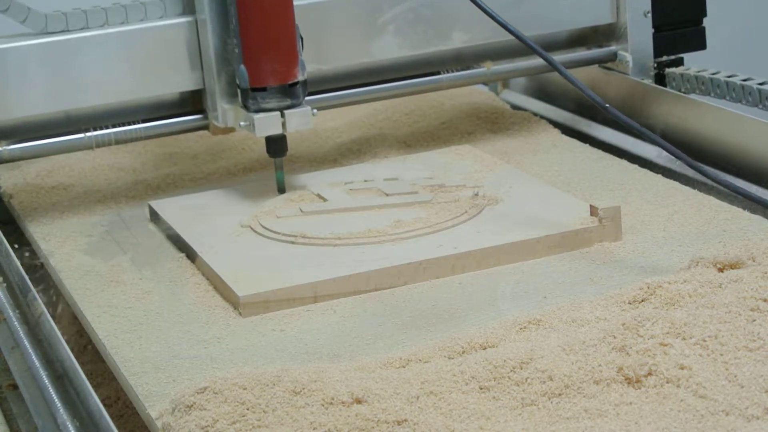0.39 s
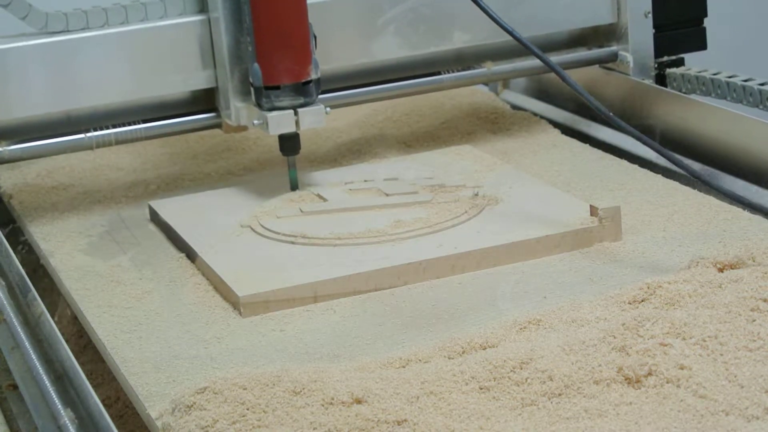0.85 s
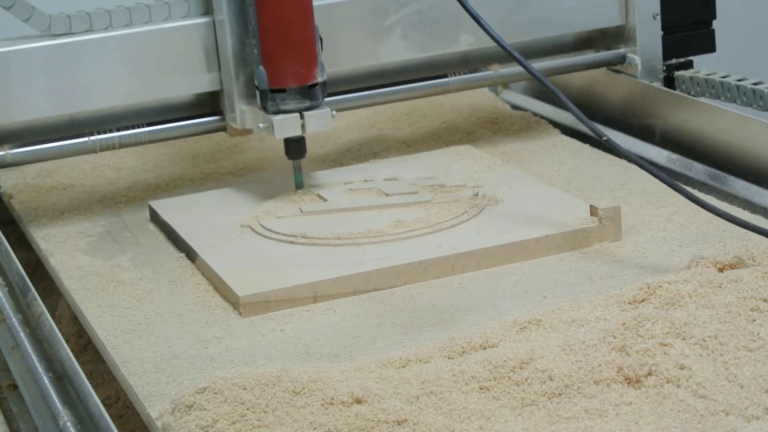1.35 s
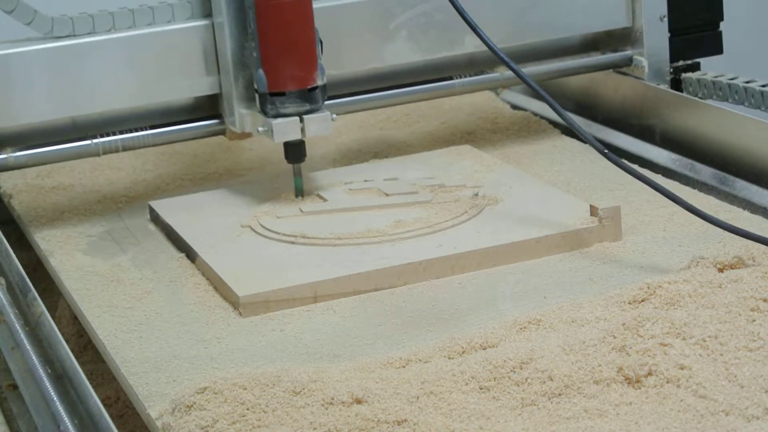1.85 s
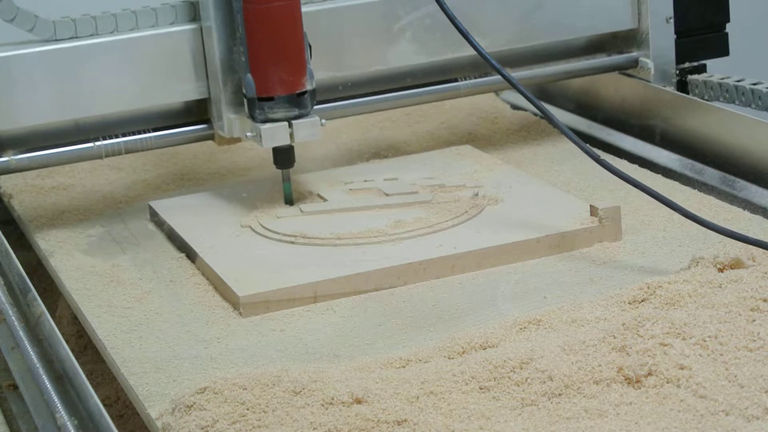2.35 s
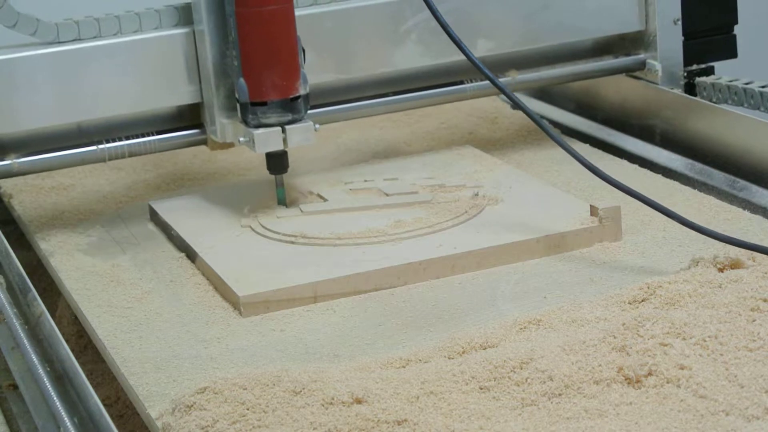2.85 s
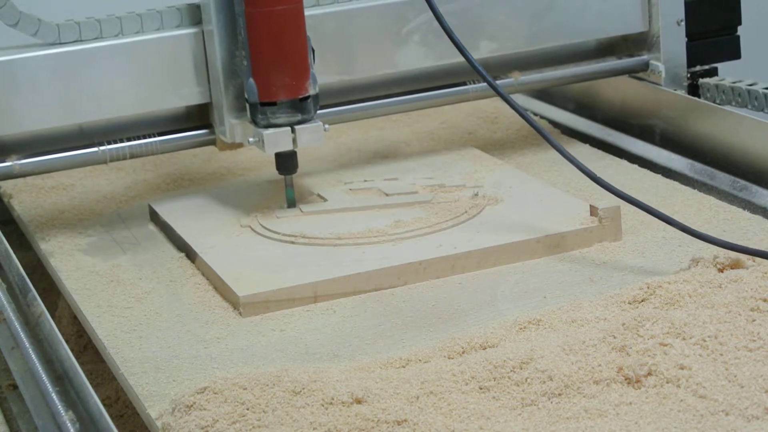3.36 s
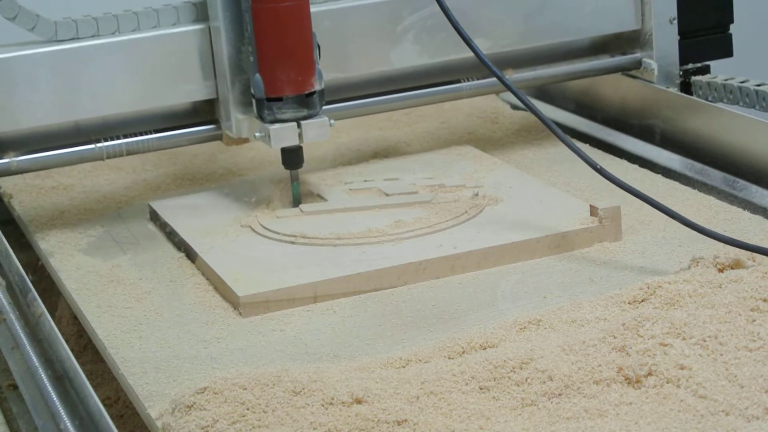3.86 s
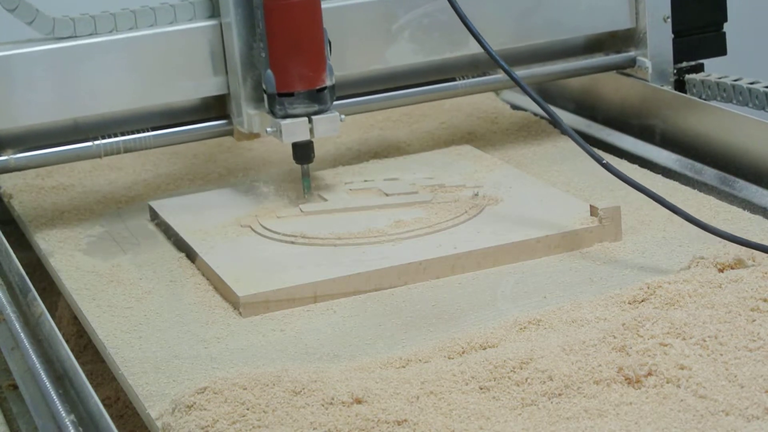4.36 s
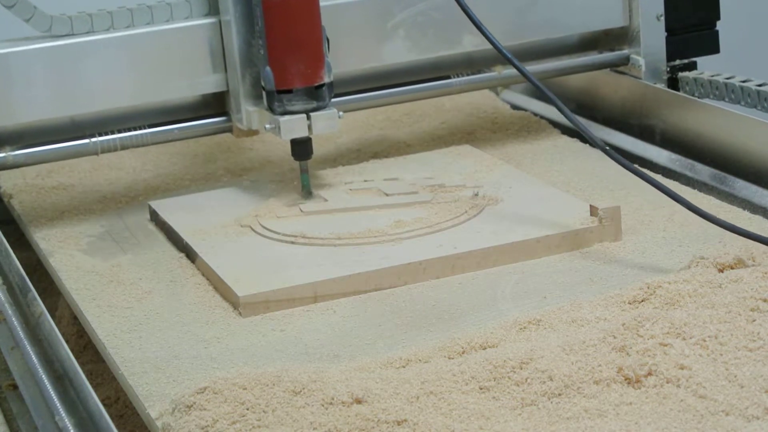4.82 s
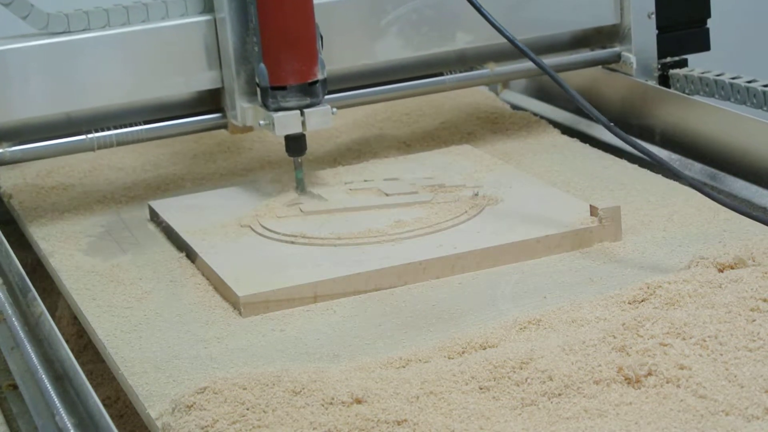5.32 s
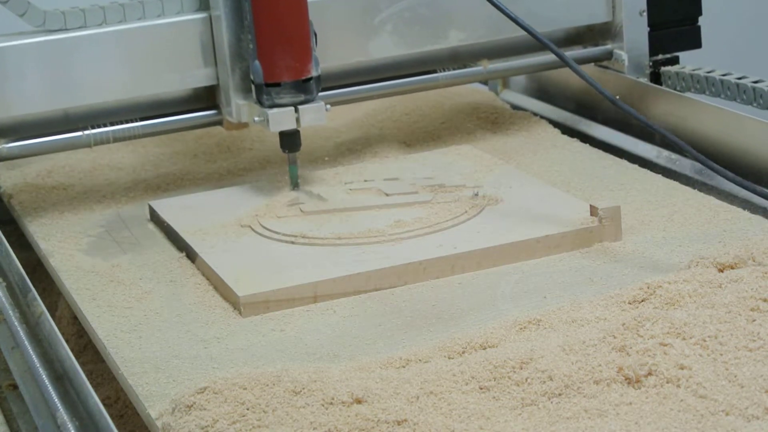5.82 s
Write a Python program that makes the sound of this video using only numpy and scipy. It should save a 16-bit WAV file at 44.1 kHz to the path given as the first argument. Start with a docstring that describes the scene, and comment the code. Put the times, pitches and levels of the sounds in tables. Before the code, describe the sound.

A high-speed router spindle whines steadily while its cutter rasps through a wooden board, pitch sagging and rising slightly, with piercing chatter and airy hiss.

```python
"""Router spindle milling a board

A router spindle on a gantry mills a wooden board in a hard workshop, heard by two microphone ports.
The two-flute cutter sings at multiples of the shaft speed, which sags under load; in two spells the bit
chatters at its own resonance. Cooling fan, brushes and chips are shaped noise that hisses and rasps;
the frame rumbles and the axis motors hum faintly below as gliding sines."""
import sys
import numpy as np
from scipy import signal
from scipy.fft import rfft, irfft, next_fast_len
from scipy.io import wavfile
from scipy.ndimage import uniform_filter1d, map_coordinates

SR = 44100
rng = np.random.default_rng(int(sys.argv[2]) if len(sys.argv) > 2 else 0)


def field_ratio(decibels):
    """Amplitude ratio for a level in dB (20 dB per decade); scalars and array-likes work."""
    return 10 ** (np.asarray(decibels, dtype=float) / 20)


def unload_wav(signal):
    """Save mono or channel-first audio to the path in sys.argv[1] as 16-bit WAV at rate SR, clipped to [-1, 1]."""
    wavfile.write(
        sys.argv[1],
        SR,
        np.round(np.clip(np.atleast_2d(signal).T, -1, 1) * 32767).astype(np.int16),
    )


N = 273403
COARSE = np.arange(0, N + 64, 64)  # sample positions at which slow gains are drawn

# shaft speed: (start_s, shaft_turns_hz)
SHAFT_SPEED = [(0.0, 413.3), (0.26, 413.9), (0.58, 412.2), (0.66, 416.7), (0.76, 417.0), (0.86, 400.5),
               (1.0, 402.6), (1.4, 402.0), (1.95, 404.8), (2.2, 404.8), (2.61, 401.8), (3.1, 405.5),
               (3.17, 412.0), (3.31, 406.5), (3.44, 414.6), (3.59, 395.2), (3.75, 399.0), (4.11, 395.3),
               (4.35, 400.0), (4.43, 397.5), (4.56, 403.0), (4.68, 432.5), (4.84, 431.6), (4.95, 428.6),
               (5.6, 425.8), (5.68, 424.3), (6.07, 425.3), (6.2, 419.0)]
# cutter passes shift the order levels: (start_s, end_s, even_orders_db, odd_orders_db, tilt_db_per_octave)
CUTTER_PASSES = [(0, .85, 3, 1, -0.5), (0.926, 3.084, 0.5, -2, 0), (3.2, 3.299, -3.5, -4, -3.5),
                 (3.65, 4.396, -0.5, -4.5, -2), (4.6, 4.778, -5.5, -1.5, -1.5), (4.9, 5.99, -2, 2.5, 1),
                 (6.075, 6.2, 4.5, -1, 0.5)]
# two spells of bit chatter: (start_s, resonance_hz, level_db, beat_depth_0_to_1)
CHATTER_SPELLS = [
    [(0.8, 3660, -33, 0.7), (0.91, 3646, -26, 0.64), (1.15, 3650, -36.5, 0.75), (1.3, 3650, -23.5, 0.43),
     (1.78, 3654, -30.5, 0.73), (1.87, 3724, -28.5, 0.3), (2.4, 3678, -24, 0.23), (2.47, 3671, -30, 0.25),
     (2.65, 3678, -19, .2), (2.75, 3674, -29, .2), (2.82, 3680, -20.5, 0.04), (3.02, 3667, -25.5, 0.01),
     (3.15, 3734, -37, 0.1), (3.55, 3620, -29.5, .5)],
    [(5.5, 3690, -54, .3), (5.62, 3647, -33.5, 0.2), (5.86, 3615, -33, 0.2), (6.0, 3640, -41, .3)],
]
# side tones of the chatter, chopped by the teeth: distance (shaft_orders)
CHOP_OFFSETS = (-2, -1, 1, 2, 4)
# the same side tones: level relative to the chatter (level_db)
CHOP_LEVELS = (-16.5, -29, -20, -13, -27)
# noise levels before their random wander: (start_s, rasp_db, hiss_db, frame_rumble_db)
NOISE_LEVELS = [(0.0, -31.5, -30.5, -55.5), (0.5, -33.5, -32, -56.5), (1.0, -33, -29, -58),
                (1.36, -35, -31, -69), (1.97, -32.5, -31.5, -55.5), (2.4, -35, -31, -60),
                (2.7, -36, -34.5, -64), (3.18, -37, -34.5, -62), (3.45, -29.5, -28.5, -53.5),
                (3.75, -32, -30.5, -63.5), (4.25, -31, -28.5, -58), (4.6, -31.5, -32, -56.5),
                (4.9, -29, -27, -60), (5.18, -30.5, -30.5, -64), (5.85, -29, -29.5, -61),
                (6.2, -30, -28.5, -51.5)]
# relative noise spectra of chips, fan, brushes and frame, each (frequency_hz, density_db_per_hz)
RASP_SPECTRUM = [(250, -74), (350, -16.5), (500, -14.5), (700, -2), (1000, -3), (1350, 3), (1850, -2),
                 (2200, 0.5), (2800, 1), (3800, 3.5), (5000, -5.5), (7000, -57)]
FAN_SPECTRUM = [(2500, -58), (3500, -8.5), (5000, 1), (6500, 2), (8000, 2.5), (9500, -6), (12000, -60)]
BRUSH_SPECTRUM = [(6500, -64), (8500, -6), (10000, -1), (12500, -1.5), (14500, -5), (16000, -14),
                  (18000, -30)]
FRAME_SPECTRUM = [(20, -30), (40, -16), (90, -17.5), (120, 0.5), (170, -1), (220, -2.5), (300, 2.5),
                  (400, -16.5), (600, -53)]
# feed motor hum before its wander: (start_s, pitch_hz, level_db)
AXIS_HUM = [(0, 235, -66), (.5, 180, -68), (1.4, 192, -67), (1.8, 168, -72), (2.15, 258, -64),
            (2.6, 305, -65), (2.9, 340, -78), (3.9, 315, -68), (4.3, 255, -63), (4.5, 240, -78),
            (5.75, 360, -69), (6.2, 285, -65)]
# left-right likeness of the noise: (frequency_hz, likeness_0_to_1)
NOISE_LIKENESS = [(100, 0.87), (300, 0.89), (600, 0.81), (1200, 0.39), (1900, 0.81), (2800, 0.081),
                  (4400, .02), (8000, .03), (14000, 0.24)]
# tonal balance between the ports: (frequency_hz, left_over_right_db)
PORT_LEAN = [(100, 0.5), (2800, 0), (7000, 0), (10000, 2), (14000, 5.5)]
# opposed part of each tone: (frequency_hz, side_relative_to_mid_db)
TONE_SIDE_LEVEL = [(400, -10), (800, -19.5), (1600, -7), (2400, -2.5), (3600, 1), (8000, 0.5)]
# decay of the workshop: (frequency_hz, t60_s)
SHOP_DECAY = [(200, 1), (1500, 1), (5000, 1), (12000, 0.6)]
# tooth tone and its first three overtones: (start_s, tooth_db, overtone_1_db, overtone_2_db, overtone_3_db)
TOOTH_LEVELS = [(0.0, -46.5, -31, -30, -33.5), (0.28, -34.5, -40.5, -30, -28),
                (0.52, -32.5, -32.5, -28, -45), (0.69, -31, -26.5, -29, -27.5),
                (0.83, -25, -28, -32.5, -35), (1.02, -30.5, -39, -31, -38), (1.24, -23, -37, -29.5, -31.5),
                (1.4, -32.5, -43, -39, -34), (1.57, -26, -39, -28, -35.5), (1.9, -30, -24, -34, -35),
                (2.23, -30, -19.5, -34.5, -36), (2.37, -29.5, -26, -29, -33),
                (2.61, -30.5, -33.5, -35, -30.5), (2.95, -28, -26.5, -39, -36.5),
                (3.06, -31.5, -32.5, -26.5, -37), (3.23, -26, -24.5, -50, -39), (3.33, -20, -39, -31, -41),
                (3.4, -25.5, -31, -45, -41), (3.49, -29, -17.5, -27, -34), (3.63, -30, -27.5, -31.5, -34),
                (3.92, -37, -17, -28.5, -35.5), (4.04, -40, -33.5, -34, -35), (4.07, -31, -22.5, -36, -33),
                (4.52, -38, -25.5, -32.5, -33.5), (4.82, -27.5, -38, -38, -38.5),
                (5.11, -29.5, -30.5, -31, -29), (5.61, -25.5, -33.5, -33, -36),
                (5.75, -20.5, -29.5, -30, -28.5), (5.8, -26.5, -31.5, -39, -40),
                (5.96, -28, -29.5, -28.5, -28), (6.11, -33.5, -27, -47, -28.5), (6.2, -28, -19.5, -27, -31)]
# throb of the first overtone: (start_s, end_s, rate_hz, crest_s, depth_0_to_1)
OVERTONE_THROB = (3.97, 4.3, 10.9, 4.04, 0.63)
# strong shaft orders, before passes, stutter and housing: (multiple_of_shaft_speed, level_db)
ORDER_LEVELS = [(1, -50), (3, -50), (5, -44.5), (7, -48), (9, -38.5), (10, -37.5), (11, -47), (12, -41),
                (13, -47), (14, -40), (15, -46), (16, -39.5), (17, -45.5), (18, -38), (19, -45.5),
                (20, -41), (22, -41.5), (24, -42.5), (26, -45), (28, -44), (30, -50), (32, -55)]
# housing resonances lift an order that meets them: (centre_hz, width_hz, lift_db)
HOUSING_LIFTS = [(1242, 13, 7), (3895, 60, 3), (5864, 75, 2.5), (9450, 83, 5), (9920, 45, 5),
                 (11980, 140, 9)]
# short tonal swells: (crest_s, pitch_hz, level_db)
BLOOM_SWELLS = [(.81, 822, -27), (.865, 815, -24.5), (4.559, 814, -23), (4.675, 824, -26)]

FAINT_DB, FAINT_FALL_DB = -46.5, 0.3  # remaining orders to the 38th: level at order 21, loss per order
FAN_DB = -1.5  # fan gain on the shared hiss level
BLOOM_S = 0.021  # time from a bloom's crest to 1/e of its height
# the tones stutter while the pitch glides, as the room's lingering old pitch clashes with the new
# (unrest: stutter over steady tone)
CALM_UNREST, UNREST_PER_HZ_S, UNREST_SPAN_S, UNREST_LAG_S = 0.15, 0.0098, 0.24, 0.085


def unit(x):
    """Scaled to rms 1."""
    return x / np.sqrt(np.mean(np.abs(x) ** 2) + 1e-20)


def along(points, hz):
    """Reads (frequency_hz, value) points on a log frequency axis."""
    f, v = np.transpose(points)
    return np.interp(np.log(hz + 1), np.log(f + 1), v)


def curves(rows):
    """One value per sample for each column after the time."""
    s, *cols = np.transpose(rows)
    return [np.interp(np.arange(N) / SR, s, c) for c in cols]


def knots(rate):
    """A smooth random curve of rms 1 on the coarse grid, rate knots a second."""
    return unit(map_coordinates(rng.standard_normal(1000), [COARSE * rate / SR], mode="wrap"))


def fine(slow):
    """From the coarse grid to every sample."""
    return np.interp(np.arange(N), COARSE, slow)


def wobble(rate):
    """A smooth random curve, one value per sample."""
    return fine(knots(rate))


def phasor(rate):
    """A wandering complex gain of rms 1: standing waves that shift as the gantry moves."""
    return (knots(rate) + 1j * knots(rate)) / np.sqrt(2)


def filtered(x, response):
    """x shaped by a response of frequency."""
    m = next_fast_len(N + 8192)
    spectrum = rfft(x, m) * response(np.fft.rfftfreq(m, 1 / SR))
    return irfft(spectrum, m)[..., :N]


def turns(hz):
    """Phase in radians of a frequency curve."""
    return 2 * np.pi * np.cumsum(hz) / SR


def ports(tone, hz, gain, mid, rate):
    """A complex tone at both ports: a shared part and an opposed part that wanders on its own."""
    side = field_ratio(along(TONE_SIDE_LEVEL, hz)) * phasor(rate)
    left, right = fine(gain * (mid + side)), fine(gain * (mid - side))
    return np.sqrt(2) * np.real(tone * np.array([left, right]))


def rush(spectrum, patchy_db):
    """Stereo noise of mid rms 1 with patches of random gain."""
    z = signal.stft(rng.standard_normal((2, N)), nperseg=512)[2]
    field = uniform_filter1d(rng.standard_normal(z.shape[1:]), 5, 0)
    field = uniform_filter1d(field, 12, 1)
    pair = signal.istft(z * field_ratio(patchy_db * unit(field)), nperseg=512)[1][:, :N]

    def mid_side(hz):
        angle = np.arccos(np.clip(along(NOISE_LIKENESS, hz), -1, 1)) / 2
        return field_ratio(along(spectrum, hz)) * [np.cos(angle), np.sin(angle)]

    mid, side = filtered(pair, mid_side)
    return np.array([mid + side, mid - side]) / np.std(mid)


def shop(x):
    """The workshop's noise-like tail, one for each port; it holds the old pitch for a moment."""
    hz, t, z = signal.stft(rng.standard_normal((2, SR // 2)), SR, nperseg=256)
    decay = field_ratio(-60 * t / along(SHOP_DECAY, hz)[:, None])
    tail = signal.istft(z * decay, SR, nperseg=256)[1]
    return signal.fftconvolve(x, tail / np.linalg.norm(tail[0]), axes=1)[:, :N]


def axes():
    """Feed motors glide with the curve of the cut; a driver fan hums around one pitch."""
    hz, db = curves(AXIS_HUM)
    glide = field_ratio(db + 4.1 * wobble(5.1)) * np.sin(turns(hz + 2 * wobble(8)))
    fan_hum = field_ratio(-67.5 + 2.8 * wobble(3.76)) * np.sin(turns(166 + 1.75 * wobble(3.1)))
    return glide + fan_hum


def air(shaft):
    """Chips rasp off the wood, the fan blows, the brushes hiss, the frame rumbles: four shaped noises."""
    rasp_db, hiss_db, frame_db = curves(NOISE_LEVELS)
    bite = 1 + 0.22 * np.cos(2 * shaft)  # fan and brush noise swells a little with every tooth
    shared_db = 0.5 * wobble(7.2)
    out = field_ratio(rasp_db + shared_db + 0.86 * wobble(5.14)) * rush(RASP_SPECTRUM, patchy_db=1.5)
    fan_gain = field_ratio(hiss_db + FAN_DB + shared_db + 0.51 * wobble(11))
    out += fan_gain * bite * rush(FAN_SPECTRUM, patchy_db=1.36)
    brush_gain = field_ratio(hiss_db + shared_db + 0.53 * wobble(7.3))
    out += brush_gain * bite * rush(BRUSH_SPECTRUM, patchy_db=1.1)
    return out + field_ratio(frame_db + 2.7 * wobble(5.13)) * rush(FRAME_SPECTRUM, patchy_db=4.0)


def blooms():
    """Short bell-shaped swells of fixed-pitch sines, alike at both ports."""
    out, t = np.zeros(N), np.arange(N) / SR
    for crest_s, hz, db in BLOOM_SWELLS:
        swell = np.exp(-((t - crest_s) / BLOOM_S) ** 2)
        out += np.sqrt(2) * field_ratio(db) * swell * np.sin(2 * np.pi * hz * t)
    return out


def chatter(shaft):
    """The bit rings at its bending resonance, beating with the ninth shaft order and chopped by the teeth."""
    out, t = np.zeros((2, N)), np.arange(N) / SR
    for rows in CHATTER_SPELLS:
        hz, db, depth = curves(rows)
        on = np.clip(np.minimum(t - rows[0][0], rows[-1][0] - t) / 0.015, 0, 1)
        phase = turns(hz + 2 * wobble(12))
        beat = np.cos(phase - 9 * shaft + 1.6 * wobble(14))
        ring = on * field_ratio(db) * (1 + np.clip(depth, 0, 1) * beat) * np.exp(1j * phase)
        out += ports(ring, 3670, 0.99, 1 + 0.2 * phasor(40), 4.02)
        for k, band_db in zip(CHOP_OFFSETS, CHOP_LEVELS):
            out += ports(ring * np.exp(1j * k * shaft), 3670, field_ratio(band_db), phasor(5.07), 4.95)
    return out


def unrest():
    """Stutter depth: grows with how fast the pitch has just glided, as old pitch in the room meets new."""
    speed = lambda s: np.interp(s, *np.transpose(SHAFT_SPEED))
    s = COARSE / SR - UNREST_LAG_S
    change = np.abs(speed(s + 0.01) - speed(s - 0.01)) / 0.02  # Hz per second
    span = max(int(UNREST_SPAN_S * SR / COARSE[1]), 1)
    return CALM_UNREST + UNREST_PER_HZ_S * uniform_filter1d(change, span)


def orders(shaft, shaft_hz):
    """Imbalance, fan blades, commutator and higher tooth overtones, each wavering on its own."""
    out, rough = np.zeros((2, N)), unrest()
    levels = {round(order): db for order, db in ORDER_LEVELS}
    s = np.ravel([row[:2] for row in CUTTER_PASSES])
    shifts = np.transpose(CUTTER_PASSES)[2:]
    even_db, odd_db, tilt_db = (np.interp(COARSE / SR, s, np.repeat(c, 2)) for c in shifts)
    for order in sorted({*levels, *range(21, 39)}):
        hz = order * shaft_hz[np.minimum(COARSE, N - 1)]
        db = levels.get(order, FAINT_DB - FAINT_FALL_DB * (order - 21))
        # higher orders lose more to unrest and waver more
        db = db - 0.95 * rough * np.log2(order) + 0.38 * np.log2(order) * knots(1.26)
        db = db + sum(lift / (1 + ((hz - centre) / width) ** 2) for centre, width, lift in HOUSING_LIFTS)
        db = db + (odd_db if order % 2 else even_db) + tilt_db * np.log2(max(order, 6) / 12)
        # no two turns cut alike: a fuzzy skirt around every line
        mid = 0.95 + 0.38 * phasor(8) + 0.8 * rough * phasor(40) + 0.35 * phasor(110)
        start = 2 * np.pi * rng.random()
        out += ports(np.exp(1j * (order * shaft + start)), hz.mean(), field_ratio(db), mid, 7)
    return out


def teeth(shaft, shaft_hz):
    """The tooth tone (two flutes: twice the shaft speed) and its first three overtones."""
    out, rough, t = np.zeros((2, N)), unrest(), COARSE / SR
    start, end, rate_hz, crest, depth = OVERTONE_THROB
    fade = np.clip(np.minimum(t - start, end - t) / 0.05, 0, 1)
    throb = fade * depth * np.cos(2 * np.pi * rate_hz * (t - crest))
    s, *levels = np.transpose(TOOTH_LEVELS)
    for k, db in enumerate(levels, 1):
        stutter = rough * phasor(48)
        mid = (1 + stutter) / np.sqrt(1 + rough ** 2) + 0.097 * phasor(110) + 0.15 * phasor(9)
        gain = field_ratio(np.interp(t, s, db)) * (1 + throb * (k == 2))  # only the first overtone throbs
        out += ports(np.exp(2j * k * shaft), 2 * k * shaft_hz.mean(), gain, mid, 5)
    return out


def scene():
    """Cutter tones with their room tail, over the noise and the motor hum."""
    (shaft_hz,) = curves(SHAFT_SPEED)
    shaft = turns(shaft_hz + 0.3008 * wobble(9))  # radians
    tones = teeth(shaft, shaft_hz) + orders(shaft, shaft_hz) + chatter(shaft) + blooms()
    return tones + field_ratio(-10) * shop(tones) + air(shaft) + axes()


def low_pass(x):
    """Removes everything above the highest recorded frequency."""
    return signal.sosfilt(signal.butter(12, 15750, fs=SR, output="sos"), x)


def record(dry):
    """Two microphone ports, the right one shaded in the treble."""
    lean = lambda hz: field_ratio(along(PORT_LEAN, hz) / 2 * np.array([[1], [-1]]))
    mix = filtered(dry, lean)
    return low_pass(mix)


dry = scene()
out = record(dry)
unload_wav(out)
```